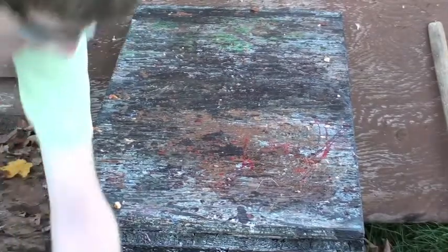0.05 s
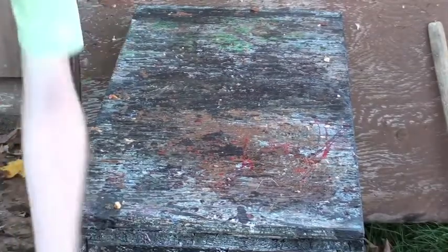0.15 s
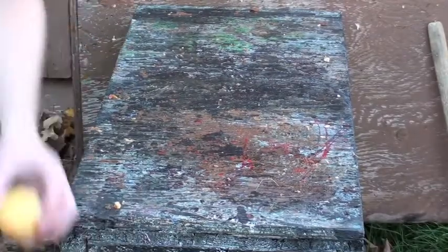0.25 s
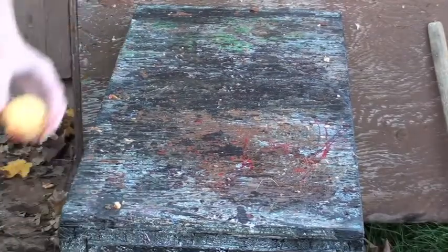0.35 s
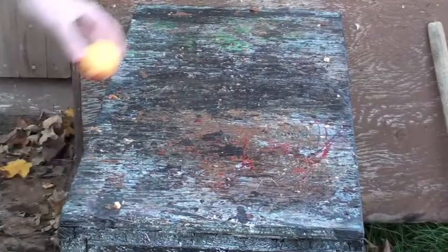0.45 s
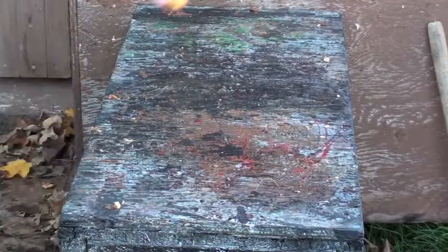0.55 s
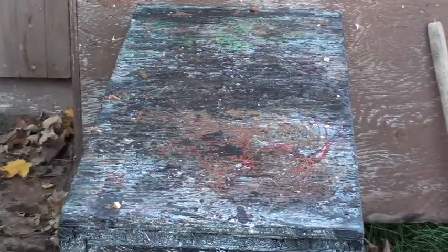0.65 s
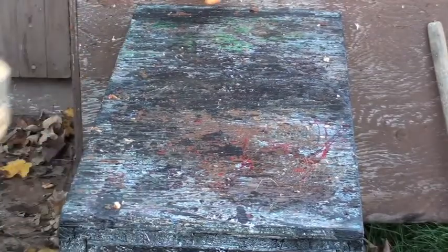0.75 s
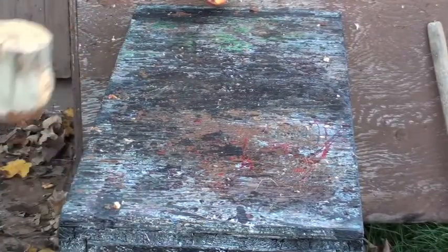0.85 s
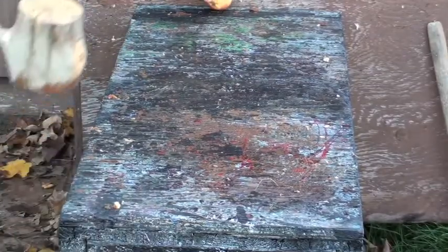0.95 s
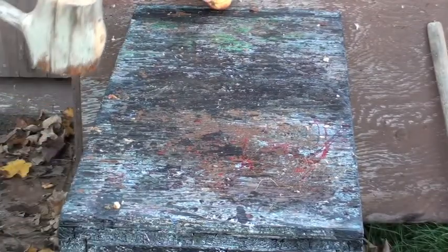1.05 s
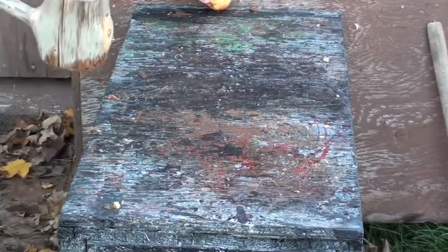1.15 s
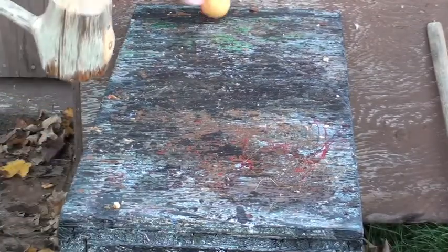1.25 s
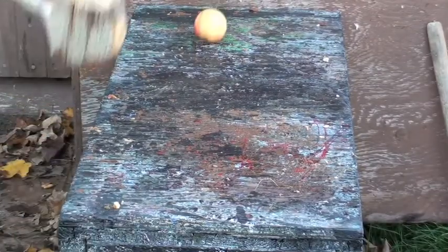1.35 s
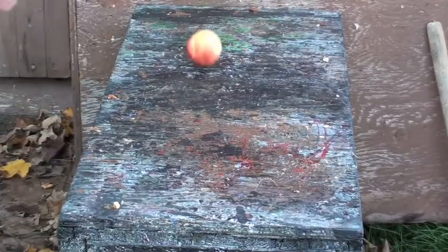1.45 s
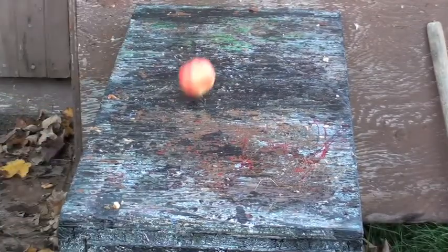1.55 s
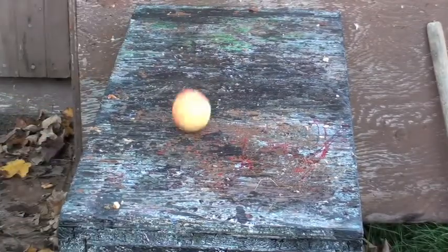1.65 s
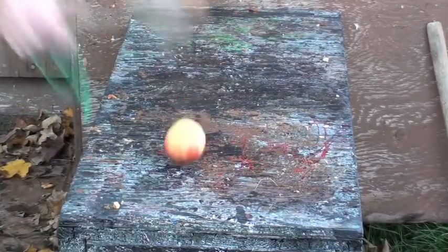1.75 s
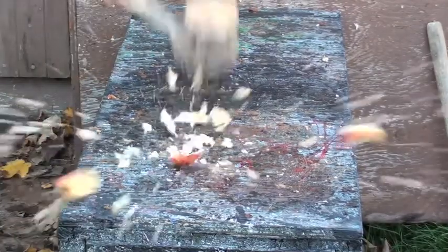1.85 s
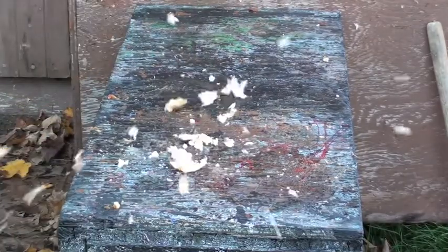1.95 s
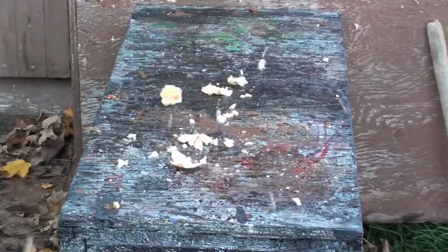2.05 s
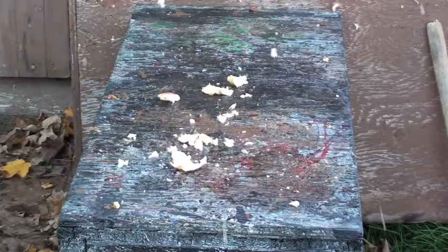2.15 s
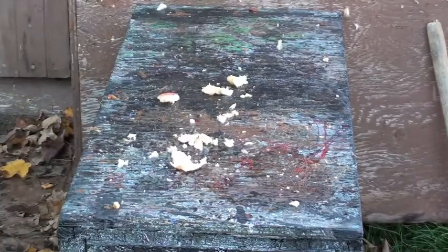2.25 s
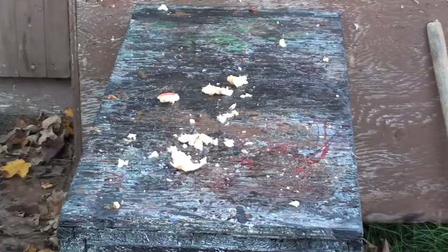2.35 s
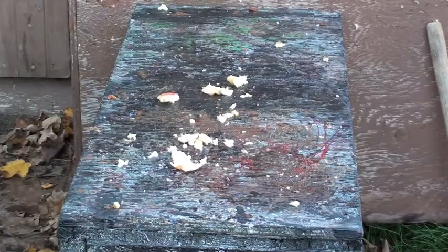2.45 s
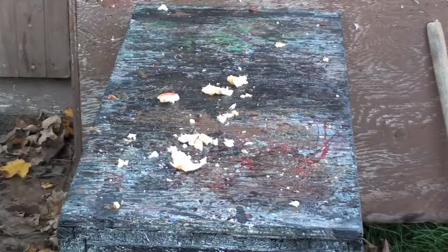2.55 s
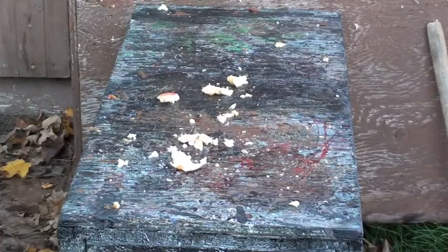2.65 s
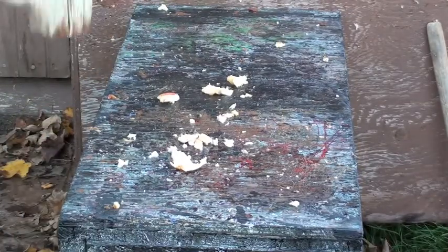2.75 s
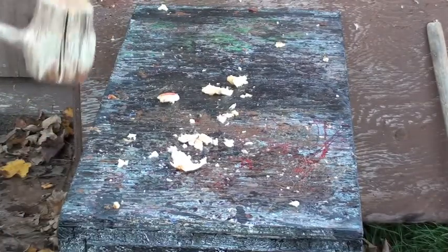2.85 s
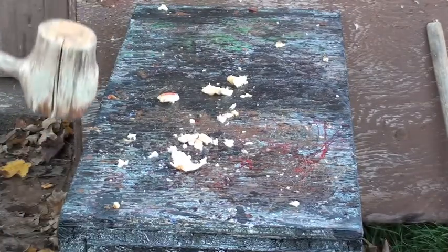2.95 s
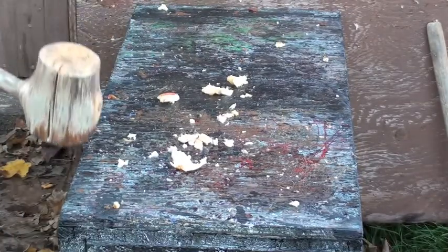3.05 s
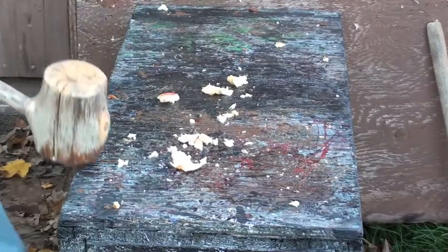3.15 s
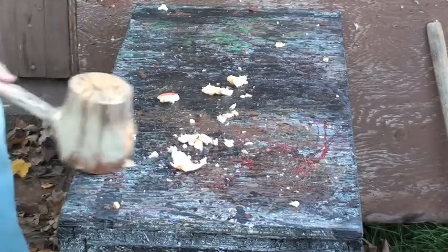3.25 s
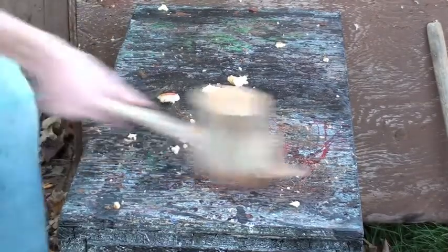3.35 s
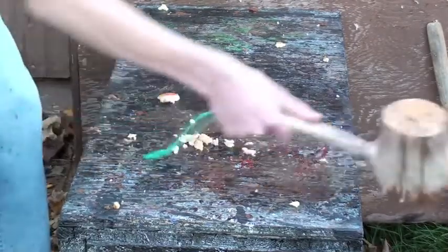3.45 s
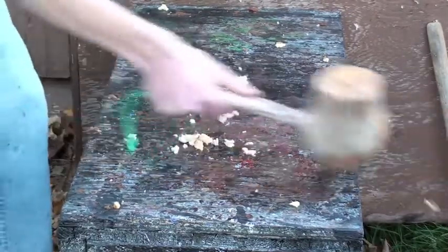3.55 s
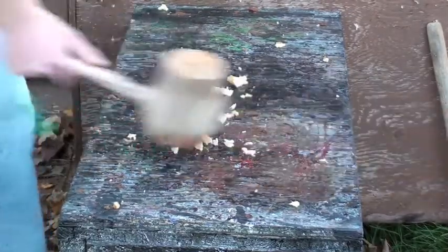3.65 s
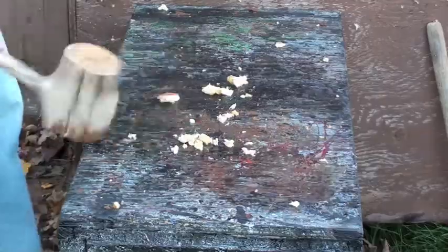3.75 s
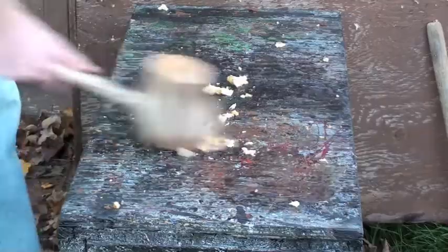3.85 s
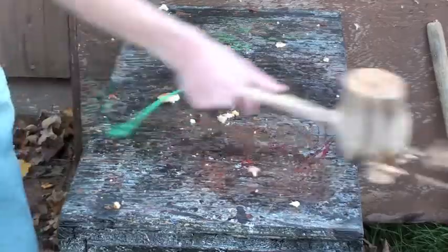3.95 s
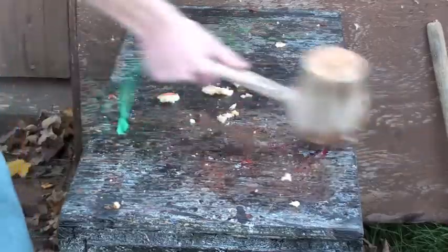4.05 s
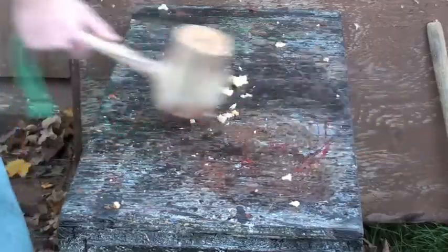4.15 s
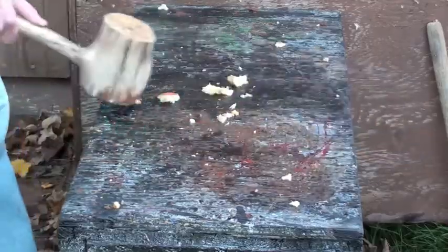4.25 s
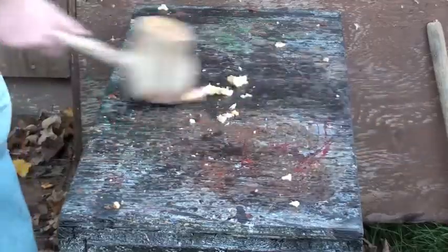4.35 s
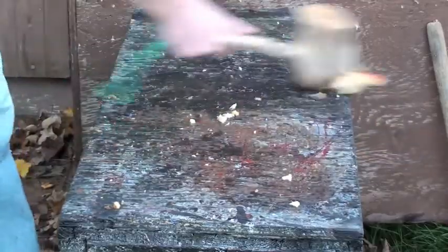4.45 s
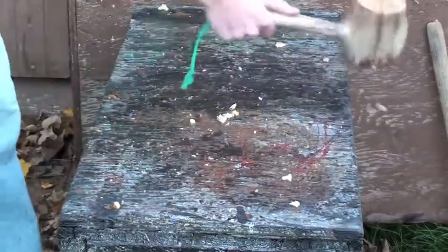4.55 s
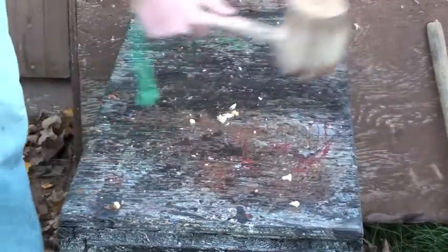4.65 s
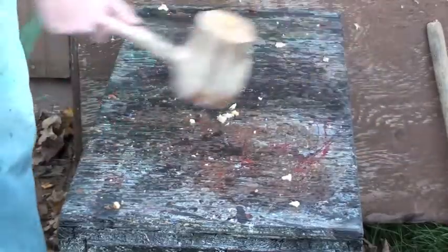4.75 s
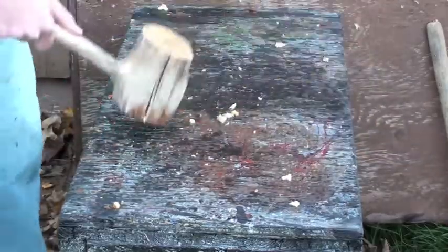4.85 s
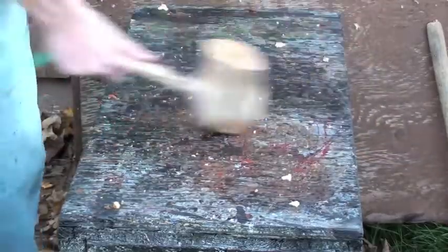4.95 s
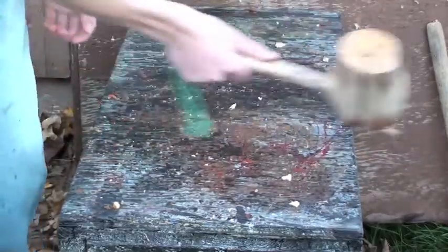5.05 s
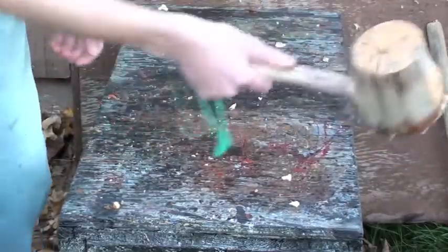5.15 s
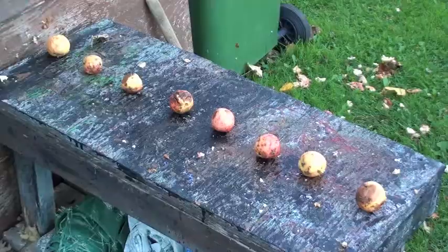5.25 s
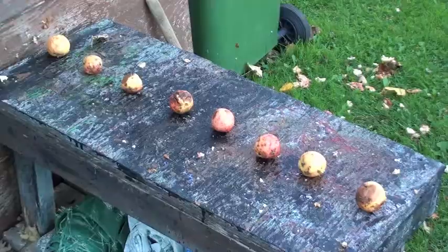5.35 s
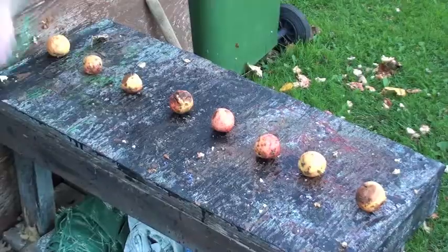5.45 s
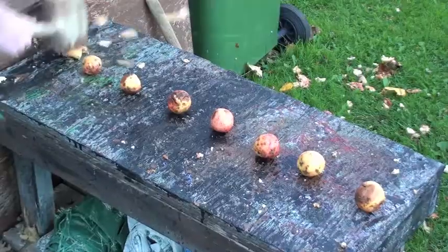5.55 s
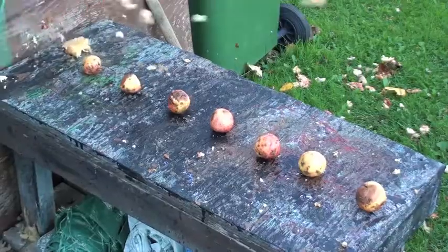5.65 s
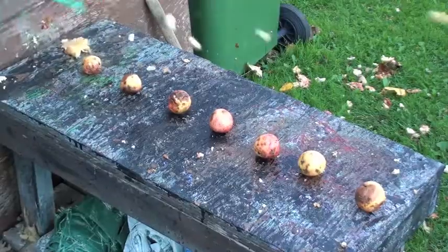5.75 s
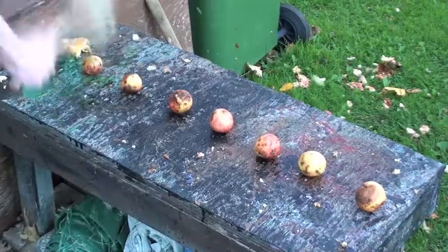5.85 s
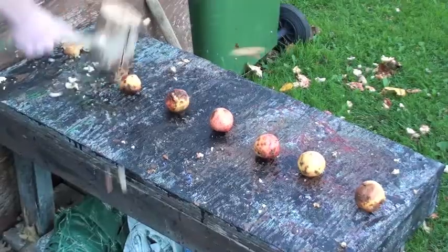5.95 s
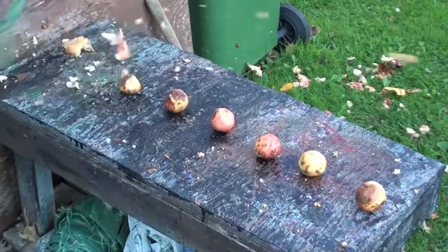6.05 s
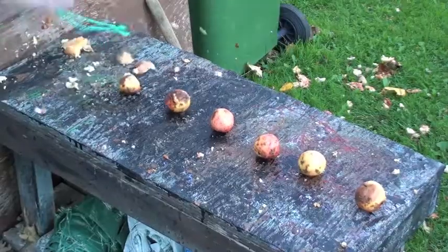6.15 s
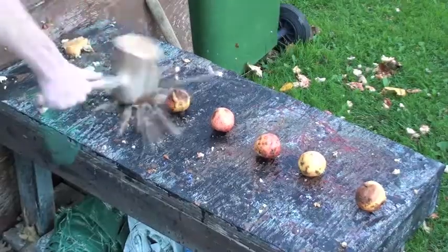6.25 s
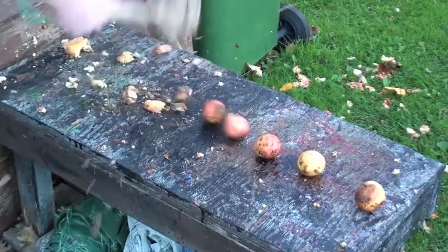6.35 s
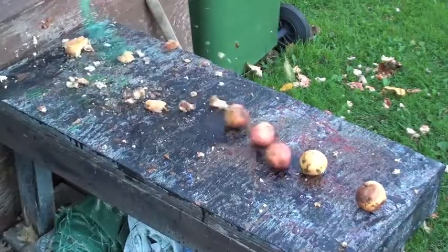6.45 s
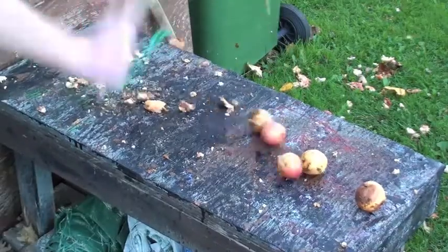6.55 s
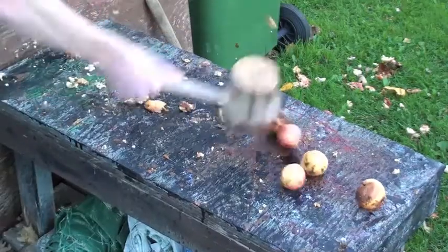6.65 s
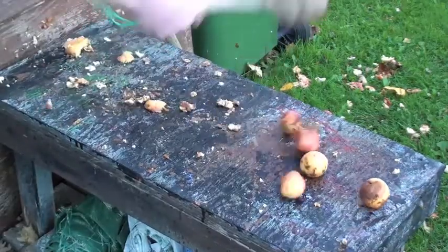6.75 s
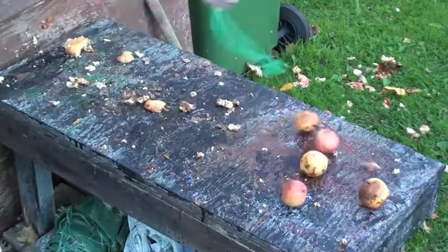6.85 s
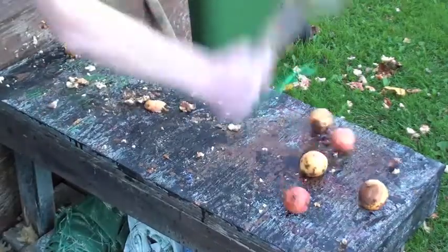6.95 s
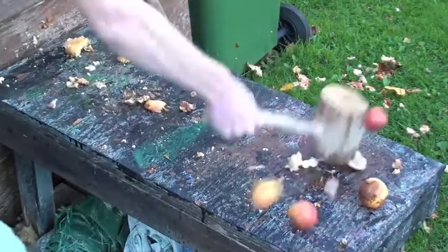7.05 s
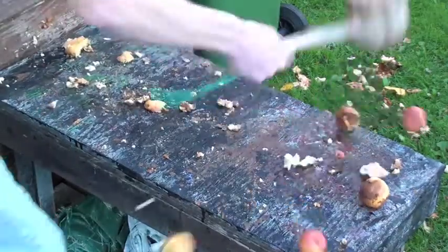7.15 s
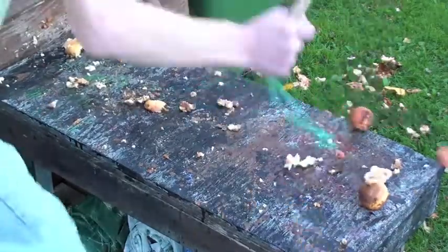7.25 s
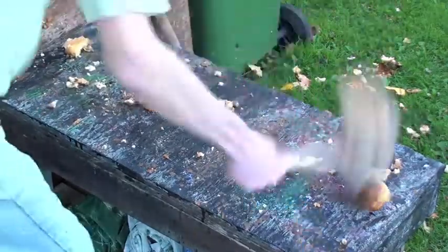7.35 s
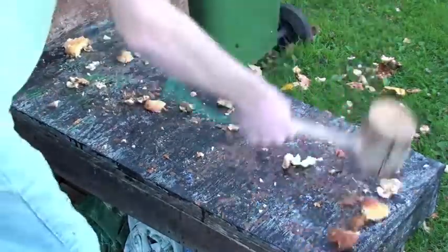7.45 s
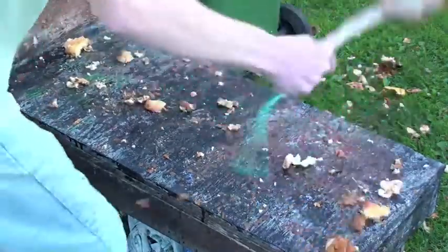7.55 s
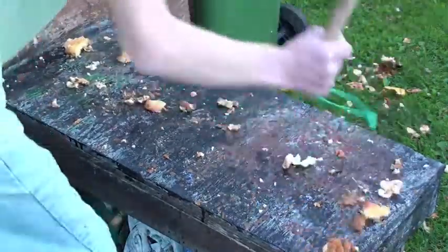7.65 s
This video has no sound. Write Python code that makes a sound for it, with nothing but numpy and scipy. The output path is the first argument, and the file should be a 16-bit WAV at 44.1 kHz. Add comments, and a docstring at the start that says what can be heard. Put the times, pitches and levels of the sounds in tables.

```python
"""In a back yard, a wooden mallet smashes apples on a plank bench, heard from close by.
An apple rolls down the bench and is burst; the mallet knocks and sweeps pulp away three times, then knocks once more.
After a short fade, six quick blows run along a row of apples; bits patter down and a thin poncho rustles.
Wood is modal resonance shaped by contact hardness; fruit is trains of tiny snaps, filtered and enveloped;
fabric is clumped crackle, and the yard is filtered noise with early reflections and a faint tail."""
import sys
import numpy as np
from scipy import signal
from scipy.fft import rfft, irfft, next_fast_len
from scipy.io import wavfile
from scipy.ndimage import uniform_filter1d, minimum_filter1d

SR = 44100
rng = np.random.default_rng(int(sys.argv[2]) if len(sys.argv) > 2 else 0)


def unload_wav(signal):
    """Save mono or channel-first audio to the path in sys.argv[1] as 16-bit WAV at rate SR, clipped to [-1, 1]."""
    wavfile.write(
        sys.argv[1],
        SR,
        np.round(np.clip(np.atleast_2d(signal).T, -1, 1) * 32767).astype(np.int16),
    )


N = 339129
SCENE_T = np.arange(N) / SR  # time over the whole scene [s]
T = np.arange(SR // 2) / SR  # time within one event [s]


def amp(db):
    """Logarithmic level: decibels to amplitude gain."""
    return 10 ** (np.asarray(db) / 20)


def unit(x):
    """Normalisation: scales to an rms of 1."""
    return x / np.sqrt(np.mean(x ** 2) + 1e-20)


def read(points, hz):
    """Interpolation: reads a table along a logarithmic frequency axis."""
    f, value = np.transpose(points)
    return np.interp(np.log(hz + 1), np.log(f + 1), value)


def colour(x, points, share=1):
    """Spectral weighting: filters by a table of (frequency [Hz], gain [dB])."""
    count = x.shape[-1]
    size = next_fast_len(count, real=True)
    gain = amp(share * read(points, np.fft.rfftfreq(size, 1 / SR)))
    return irfft(rfft(x, size) * gain, size)[..., :count]


def dull(x, hz, order=1):
    """Low-pass filtering: removes what lies above a cutoff."""
    sos = signal.butter(order, min(hz, SR / 2 - 1), fs=SR, output="sos")
    return signal.sosfilt(sos, x)


def resonate(x, hz, width_hz):
    """Resonance: one complex pole, whose frequency may follow a curve."""
    turn = np.exp(2j * np.pi * np.cumsum(hz * np.ones(len(x))) / SR)
    r = np.exp(-np.pi * width_hz / SR)
    return (turn * signal.lfilter([1 - r], [1, -r], x / turn)).real


def crackle(count, per_s, spread_db):
    """Shot noise: a random train of tiny snaps, whose level changes by spread_db per unit of rarity."""
    chance, side = rng.random((2, count))
    at = np.flatnonzero(chance < per_s / SR)
    rarity = -np.log(chance[at] * SR / per_s + 1e-9)  # high values are exponentially rarer
    train = np.zeros(count)
    train[at] = np.sign(side[at] - .5) * amp(spread_db * np.minimum(rarity, 3.5))
    return train


def crunch(count, per_s, spread_db, cycles, order=20):
    """Wet crunch as granular sound: tiny pops, each a few cycles long, at log-spaced pitches."""
    out = np.zeros(count)
    for hz in np.geomspace(200, 14000, order):
        turns = np.arange(4 * cycles * SR / hz) * hz / SR
        pop = np.sin(2 * np.pi * turns) * turns * np.exp(-2 * turns / cycles)
        # high pops are more frequent than low ones
        train = crackle(count, per_s / order * np.sqrt(hz / 2000), spread_db)
        out += signal.oaconvolve(train, pop / np.linalg.norm(pop))[:count] * hz ** 0.25
    return out


def swell(start, hold_s, rise_s, fall_s):
    """Envelope over the scene: an exponential rise up to the start, a hold, an exponential fall."""
    t = SCENE_T - start
    return np.exp(-np.clip(np.maximum(-t / rise_s, (t - hold_s) / fall_s), 0, 20))


def add(mix, s, sound):
    """Superposition: mixes a sound in at a time."""
    part = mix[max(round(s * SR), 0):][:len(sound)]
    part += sound[:len(part)]


# spectrum of the outdoor hush: (frequency [Hz], relative level [dB per Hz])
HUSH_SPECTRUM = [(20, -37), (45, -15), (70, -9.5), (100, -3), (135, 1.5), (190, -6), (280, -7.5),
                 (500, -3.5), (900, -6), (1600, -11), (2800, -14), (4100, -12), (5300, -17.5),
                 (7200, -18.5), (11500, -28), (16000, -30)]
# correlation of the two ears: (frequency [Hz], left-right likeness [0 to 1])
EAR_LIKENESS = [(60, 0.99), (180, 0.95), (550, 0.89), (1650, 0.82), (4970, 0.87), (15000, 1)]
# drift of the distant hum: (time [s], gain on its middle part [dB], gain on its low part [dB])
HUM_DRIFT = [(0, 5.5, -4), (.7, 3.5, -2), (1.2, -6, 1), (2.2, 3.5, -1.5), (3, -5, 0.5), (3.7, 0.5, -1),
             (4.3, 5, 0.5), (5, 8, -5), (6.2, -2, -1.5), (7.69, -9, 0)]


def air(level_db=-44.5):
    """Partial coherence: an outdoor hush partly alike in both ears, with a slowly drifting distant hum."""
    a, b = rfft(rng.standard_normal((2, N)))
    same = np.clip(read(EAR_LIKENESS, np.fft.rfftfreq(N, 1 / SR)), 0, 1)
    right = same * a + np.sqrt(1 - same ** 2) * b
    hush = unit(colour(irfft([a, right], N), HUSH_SPECTRUM))
    hum = colour(hush, [(150, -22), (400, -14), (1100, -19), (2500, -33)])
    rumble = colour(hush, [(150, 4), (300, -70)])
    s, hum_db, rumble_db = np.transpose(HUM_DRIFT)
    hum_change = hum * (amp(np.interp(SCENE_T, s, hum_db)) - 1)
    rumble_change = rumble * (amp(np.interp(SCENE_T, s, rumble_db)) - 1)
    return amp(level_db) * (hush + hum_change + rumble_change)


# decay of the yard's tail: (frequency [Hz], 60 dB decay time [s])
YARD_DECAY = [(100, 0.56), (300, 0.34), (1200, 0.54), (4000, 0.41), (10000, 1)]


def yard(x, near_db=-15, near_s=0.011, far_db=-20):
    """Reverberation: quick reflections from the shed wall and a faint yard tail, different in each ear."""
    near, far = rng.standard_normal((2, 2, len(T)))
    near = near * np.exp(-T / near_s) * (T > .002)
    hz, t, z = signal.stft(far, SR, nperseg=256)
    decay = amp(-60 * t / read(YARD_DECAY, hz)[:, None])
    far = signal.istft(z * decay, SR, nperseg=256)[1][:, :len(T)]
    far = far * (1 - np.exp(-T / 0.011))  # the tail builds up gradually
    echo = amp(near_db) * near / np.linalg.norm(near[0]) + amp(far_db) * far / np.linalg.norm(far[0])
    return signal.fftconvolve(x[None], echo, axes=1)[:, :N]


# spectrum of the thin fabric: (frequency [Hz], relative level [dB per Hz])
FABRIC_SPECTRUM = [(300, -8), (1200, -10), (2300, -9), (3200, -4.5), (4200, -3.5), (5300, -9), (6900, -2.5),
                   (8200, -7.5), (10000, -15.5), (12500, -27.5), (16000, -34)]
# the body moving between blows: (time of the peak [s], level [dB], rise [s], fall [s])
BODY_MOVES = [(.133, -42.5, .031, 0.046), (.50, -39.5, 0.074, .07), (.60, -40.5, .026, 0.041),
              (.725, -35.5, 0.004, .05), (.785, -44.5, .027, 0.077), (1.96, -35, .04, 0.049),
              (2.43, -43, .12, 0.084), (2.96, -43, 0.057, .092), (3.04, -43, .05, 0.045),
              (3.16, -41, 0.04, .042), (3.27, -41, 0.051, 0.058), (4.89, -39, 0.033, 0.038),
              (5.112, -38.5, 0.059, 0.068), (6.93, -36, .08, .07), (7.69, -33.5, 0.03, .03)]


def poncho(clump_db=2.16):
    """Friction noise: thin fabric crinkles in clumps, swelling with each body move, lift and swing."""
    moves = list(BODY_MOVES)
    for s, *_, swish_db, lead_s in BLOWS:
        swing_s = s - lead_s
        moves.append((swing_s - 0.059, swish_db - 10, 0.044, .04))  # the softer swish of lifting the mallet
        moves.append((swing_s, swish_db, 0.04, 0.02))
    power = sum((amp(db) * swell(s, 0, rise_s, fall_s)) ** 2 for s, db, rise_s, fall_s in moves)
    clumps = amp(clump_db * unit(dull(rng.standard_normal(N), hz=60, order=2)))
    crinkle = crackle(N, per_s=7000, spread_db=4.0) * clumps
    return unit(colour(crinkle, FABRIC_SPECTRUM)) * np.sqrt(power)


# bending modes of the planks: (frequency [Hz], 60 dB decay time [s],
# relative level struck at the far end [dB], in the middle [dB], at the near end [dB])
PLANK_MODES = [(70, 0.54, -12, -47, -37), (108, 0.17, -16.5, -43, -41), (145.8, 0.17, -9, -8.5, -6),
               (194.8, 0.13, 5.5, -15, -4), (220.2, 0.25, 5, -25, -24), (248.9, 0.15, -14.5, 4.5, -19),
               (259, 0.24, -5.5, -6.5, -16), (312.6, 0.23, 3.5, -32, 10.5), (363.3, 0.25, -14, -5, 1),
               (420.3, 0.085, -0.5, 5, -15.5), (475.4, 0.15, -10, 1.5, -21), (536, 0.088, 2, -4, -21),
               (621, 0.027, -1, -3.5, 8), (750, 0.15, -33.5, -12, -20), (860, 0.18, -10, -19, -3),
               (948, 0.057, 11, -1, 11), (1130, 0.11, -14, -47, -24), (1273, 0.06, -12, 6.5, -27),
               (1570, 0.13, -16, -5, -25), (1710, 0.27, -27, -12, -24), (2100, 0.23, -19, 1, -11),
               (2520, .08, -24, -34, -19)]


def bench(places):
    """Modal synthesis: the place struck decides which plank modes speak; one row for each place."""
    hz, t60 = np.transpose(PLANK_MODES)[:2, :, None]
    gain = amp([np.interp(places, [0, .5, 1], mode[2:]) for mode in PLANK_MODES])
    # bending waves arrive with a phase that grows as the root of frequency
    lag = np.sqrt(hz) * (1 + np.array(places) / 2)
    modes = amp(-60 * T / t60) * np.exp(2j * np.pi * hz * T)
    return ((gain * np.exp(-1j * lag)).T @ modes).imag


# spectrum of the dense upper modes: (frequency [Hz], relative level [dB])
CLACK_SPECTRUM = [(60, -29), (130, -11), (250, 8), (450, 11.5), (900, 0.5), (1300, -8.5), (2000, -4),
                  (3600, -6), (5500, -13), (8000, -5), (12000, -32), (16000, -40)]


def knocks(rows, contact_s=0.0024, clack_s=0.016, clack_reach=1.48):
    """Contact stiffness: soft contact wakes low modes, hard contact also a clack of countless higher ones.

    Rows: (time [s], ring peak [dB], place [0 far to 1 near], hardness cutoff [Hz], clack [dB])."""
    out = np.zeros(N)
    rings = bench([row[2] for row in rows])
    for (s, db, _, hard_hz, clack_db), ring in zip(rows, rings):
        ring = dull(ring * (1 - np.exp(-T / contact_s)), hard_hz, order=2)
        hiss = colour(rng.standard_normal(len(T)), CLACK_SPECTRUM)
        clack = unit(dull(hiss, clack_reach * hard_hz)) * np.exp(-T / clack_s)
        add(out, s, amp(db) * ring / abs(ring).max() + amp(clack_db) * clack)
    return out


# spectrum of cracking skin, also the touch of small bits: (frequency [Hz], relative level [dB])
CRACK_SPECTRUM = [(100, -33), (400, 8), (1500, 2), (2600, 0.5), (4000, 4.5), (5300, -4.5), (7000, 0.5),
                  (8700, -6.5), (11000, -18), (16000, -71)]


def splat(db, hz, width_share, t60, tick_s=0.0012, smear_db=-9):
    """Damped resonance: a tick and a short wet smear; narrow ones plop, and all are too small to give bass."""
    t = T[:len(T) // 2]
    shape = np.exp(-t / tick_s) + amp(smear_db - 60 * t / t60)
    touch = colour(rng.standard_normal(len(t)), CRACK_SPECTRUM) * shape
    touch = touch - dull(touch, hz / 2)  # removes the bass
    tick = resonate(touch, hz, width_share * hz)
    tick = dull(resonate(tick, hz, 2 * width_share * hz), hz=10300, order=6)
    return amp(db) * tick / abs(tick).max()


# bumps of the lumpy apple: (time [s], ring peak [dB], hardness cutoff [Hz], clack [dB])
APPLE_BUMPS = [(1.319, -35, 393, -37), (1.351, -36, 500, -42), (1.422, -35, 130, -60),
               (1.463, -38, 200, -55), (1.49, -26.5, 138, -55), (1.568, -26.5, 298, -30.5),
               (1.647, -25.5, 450, -34.5), (1.729, -25.5, 300, -45), (1.786, -33, 302, -41)]


def roll(start_s=1.28, end_s=1.84, end_place=0.72, rumble_db=-52, rise_s=.45, fall_s=.02):
    """Rolling contact: the lumpy apple gathers speed down the planks, bumping and rumbling softly."""
    bumps = []
    for s, db, hard_hz, clack_db in APPLE_BUMPS:
        place = end_place * ((s - start_s) / (end_s - start_s)) ** 2  # constant acceleration
        bumps.append((s, db, place, hard_hz, clack_db))
    rumble = signal.oaconvolve(crackle(N, per_s=200, spread_db=6), bench([.25])[0])[:N]
    rumble = unit(dull(rumble, hz=240, order=2))
    rolling = (SCENE_T > start_s) * swell(end_s, 0, rise_s, fall_s)
    return knocks(bumps) + amp(rumble_db) * rumble * rolling


# larger bits landing, splatters and small clacks:
# (time [s], peak level [dB], centre frequency [Hz], 60 dB decay time of the smear [s])
LANDING_BITS = [(0.233, -26, 6460, .012), (1.650, -28, 1760, 0.051), (1.9462, -22, 7300, .05),
                (1.9853, -13.5, 7200, 0.083), (2.0207, -16.5, 1870, 0.13), (2.1186, -30.5, 1480, .06),
                (2.21, -29.5, 1470, .06), (2.2631, -17, 7500, 0.17), (2.2712, -10.5, 5330, 0.045),
                (2.2777, -7, 6000, 0.074), (2.381, -19.5, 3370, 0.023), (2.5624, -28, 6600, 0.04),
                (3.0684, -5.5, 2440, 0.045), (3.0804, -6.5, 5500, 0.016), (3.123, -24, 2520, .17),
                (3.2208, -14.5, 2650, 0.036), (6.4095, -15, 4250, .045), (7.0564, -23, 4910, 0.016),
                (7.121, -11, 4200, 0.29), (7.6286, -16.5, 6840, 0.059), (7.6743, -14.5, 3530, 0.045)]


def bits(count=6, first_s=0.059, flight_s=.28, crumb_db=-29, fade_db_per_s=30,
         low_hz=1400, high_hz=8000, plop_hz=3800, widest=0.88):
    """Scattered impacts: larger bits land one by one; crumbs shower at random after blows, late ones softer."""
    out = np.zeros(N)

    def land(s, db, hz, t60):
        width = min(hz / plop_hz, 1) * widest  # low ones plop, high ones splash
        add(out, s, splat(db, hz, width_share=width, t60=t60))

    for s, db, hz, t60 in LANDING_BITS:
        land(s, db, hz, t60)
    for s, *_ in BLOWS:
        for late, pitch in rng.random((count, 2)):
            air_s = flight_s * late ** 2
            hz = low_hz * (high_hz / low_hz) ** pitch
            land(s + first_s + air_s, crumb_db - fade_db_per_s * air_s, hz, t60=0.026)
    return out


# spectrum of ploughed pulp: (frequency [Hz], relative level [dB])
GRIT_SPECTRUM = [(150, -7), (500, 2), (900, 11.5), (1300, 2), (1700, 3.5), (2500, 5), (3800, 7), (5200, -6),
                 (7000, -2), (8700, -7.5), (11500, -26.5), (16000, -62)]
# one sweep after each of the first three knocks: (time the head meets the pulp [s], ploughing [s], run-up [s],
# judder [dB], grit [dB], catch [dB], flick [dB], knock at lift-off [dB])
SWEEP_STROKES = [(3.404, 0.061, 0.049, -22, -22, -24, -10, -13),
                 (3.925, 0.057, 0.05, -27, -23, -10, -11, -34),
                 (4.453, .046, 0.12, -23, -23, -16, -7.5, -23)]


def sweeps(place=.5, catch_hz=1200, flick_hz=2900, clump_db=3.0, judder_fall_s=0.029,
           grit_rise_share=0.37, grit_fall_s=0.024, catch_clack_db=-5):
    """Stick-slip: the head judders over the grain, catches, ploughs clumps of pulp and flicks them off the edge."""
    shake, grind, flicks = np.zeros((3, N))
    catches = []
    for (down_s, *_), stroke in zip(MALLET_KNOCKS, SWEEP_STROKES):
        s, plough_s, run_up_s, judder_db, grit_db, catch_db, flick_db, lift_db = stroke
        lift_s = s + plough_s
        touching = SCENE_T > down_s
        shake += amp(judder_db) * touching * swell(s, plough_s, run_up_s, judder_fall_s)
        grind += amp(grit_db) * touching * swell(s, plough_s, grit_rise_share * run_up_s, grit_fall_s)
        catches.append((s, catch_db, place, catch_hz, catch_db + catch_clack_db))
        catches.append((lift_s, lift_db, place, catch_hz, lift_db + catch_clack_db))
        add(flicks, lift_s, splat(flick_db, flick_hz, width_share=0.57, t60=0.033))
    slips = crackle(N, per_s=600, spread_db=1.0)
    judder = unit(dull(signal.oaconvolve(slips, bench([place])[0])[:N], hz=690))
    clumps = amp(clump_db * unit(dull(rng.standard_normal(N), hz=69.5, order=2)))
    pulp = crunch(N, per_s=6200, spread_db=-0.5, cycles=1.86)
    grit = unit(colour(pulp, GRIT_SPECTRUM) * clumps)
    return judder * shake + grit * grind + knocks(catches) + flicks


# the bare mallet set down on the planks: (time [s], ring peak [dB], place [0 far to 1 near],
# hardness cutoff [Hz], clack [dB], bounce delay [s], bounce ring peak [dB])
MALLET_KNOCKS = [(3.278, -13.5, 0.53, 680, -15.5, .009, -25.5), (3.855, -8.5, 0.41, 560, -15, .011, -19),
                 (4.381, -12, 0.664, 480, -23.5, .011, -21), (4.964, -0.5, 0.55, 563, -11, .043, -13.5)]


def bare_knocks(bounce_clack_db=-5, bounce_hz=850, wet_db=-19, wet_hz=3600):
    """Impact and rebound: the bare mallet lands on the wet planks and bounces once."""
    rows, wet = [], np.zeros(N)
    for s, db, place, hard_hz, clack_db, bounce_s, bounce_db in MALLET_KNOCKS:
        rows.append((s, db, place, hard_hz, clack_db))
        rows.append((s + bounce_s, bounce_db, place, bounce_hz, bounce_db + bounce_clack_db))
        add(wet, s, splat(db + wet_db, wet_hz, width_share=0.49, t60=0.17))
    return knocks(rows) + wet


# spectrum of crushed flesh: (frequency [Hz], relative level [dB])
PULP_SPECTRUM = [(80, -31), (200, 11.5), (500, 6), (1100, 0.5), (1500, -1), (2200, -4.5), (4200, -5.5),
                 (5400, -11.5), (7000, -9), (9000, -15.5), (12000, -23), (16000, -53)]
# the apple under each blow: (skin crack [dB], crack decay [s], squelch [dB], squelch start [Hz], spray [dB],
# spray delay [s], spray cutoff [Hz], pop delay [s], pop peak [dB], pop frequency [Hz])
BURST_APPLES = [(-15, 0.014, -28, 2700, -22, 0.0051, 13000, .0414, -16, 5400),
                (-17, 0.0041, -6, 4500, -24.5, 0.039, 6900, 0.02, -6, 880),
                (-15, 0.0093, -14.5, 5800, -25.5, 0.029, 9000, 0.014, -10, 850),
                (-14, 0.0063, -12.5, 1800, -21.5, 0.009, 6500, 0.071, -11, 690),
                (-27, .0076, 2, 1130, -15, 0.029, 5600, 0.033, -3, 1150),
                (-10.5, 0.0021, -4.5, 1950, -17, 0.044, 5000, 0.033, 1, 1860),
                (-8, 0.0025, -6, 1600, -16, 0.041, 4600, .06, -20, 1200)]


def apples(give_s=.0055, squelch_s=0.024, glide_s=0.0071, end_hz=520, width_hz=800,
           spray_s=0.026, drizzle_db=-15, drizzle_s=0.21):
    """Fracture and collapse: skin cracks, flesh gives a falling squelch and hollow pop, then pulp sprays."""
    out, count = np.zeros(N), len(T)
    for (s, *_), apple in zip(BLOWS, BURST_APPLES):
        crack_db, crack_s, squelch_db, start_hz, spray_db, delay, bright_hz, pop_s, pop_db, pop_hz = apple
        crack = unit(colour(crackle(count, per_s=9900, spread_db=2.5), CRACK_SPECTRUM))
        add(out, s, amp(crack_db) * crack * np.exp(-(T / crack_s) ** 2 / 2))
        # the pitch of the squelch sinks as the flesh brakes the mallet
        glide = end_hz + (start_hz - end_hz) * np.exp(-T / glide_s)
        cells = colour(crackle(count, per_s=9000, spread_db=-5.0), PULP_SPECTRUM)
        squelch = unit(resonate(cells, glide, width_hz))
        add(out, s + give_s, amp(squelch_db) * squelch * np.exp(-T / squelch_s))
        add(out, s + pop_s, splat(pop_db, pop_hz, width_share=0.43, t60=0.052))
        droplets = colour(crunch(count, per_s=9000, spread_db=2.5, cycles=1.9), PULP_SPECTRUM)
        spray = unit(dull(droplets, bright_hz, order=3))
        burst = np.exp(-((T - delay) / spray_s) ** 2 / 2)
        drizzle = amp(drizzle_db) * np.exp(-T / drizzle_s)
        add(out, s, amp(spray_db) * spray * (burst + drizzle))
    return out


# smashing blows: (time [s], place [0 far to 1 near], hardness cutoff [Hz], push [dB], crush time [s], thud [dB],
# rebound delay [s], rebound [dB], swing swish [dB], lead of the swish before the blow [s])
BLOWS = [(1.8459, 0.44, 1200, -7, 0.01, -22, 0.046, -26, -62, .08),
         (5.555, 0.054, 756, -6, 0.021, -1, 0.046, -15, -34, 0.021),
         (5.941, 0.054, 610, -3, .024, -1, .04, -8, -37.5, 0.071),
         (6.316, 0.069, 890, -2, 0.033, -4.5, 0.058, -4.5, -39, 0.085),
         (6.682, 0.79, 1500, 3.5, .034, -4, 0.081, -19, -38, 0.11),
         (7.075, 0.95, 700, -11.5, .012, 0, 0.047, -11, -31.5, 0.072),
         (7.44, .92, 710, -19, .014, 0, 0.057, -15.5, -28.5, .11)]


def blows(push_s=0.0019, rebound_hz=1680, push_clack_db=-13, thud_clack_db=-12.5, rebound_clack_db=-10):
    """Momentum transfer: each blow rings the bench by a push through the apple, a crushing thud and a rebound."""
    rows = []
    for s, place, hard_hz, push_db, crush_s, thud_db, rebound_s, rebound_db, _, _ in BLOWS:
        # the apple passes the push on a little late
        rows.append((s + push_s, push_db, place, hard_hz, push_db + push_clack_db))
        rows.append((s + crush_s, thud_db, place, hard_hz, thud_db + thud_clack_db))
        # the rebound lands on bare wood, so it is hard
        rows.append((s + rebound_s, rebound_db, place, rebound_hz, rebound_db + rebound_clack_db))
    return knocks(rows)


# small things radiate little deep bass: (frequency [Hz], gain [dB])
RADIATION_GAIN = [(20, -27), (45, -16), (75, -15), (110, -1.5), (16000, 1.5)]
# level difference between the ears: (frequency [Hz], left minus right [dB])
EAR_BALANCE = [(60, -7), (150, -3), (300, -3), (650, -1.5), (1400, -0.4), (4000, 0.1), (12000, 0.4)]


def scene():
    """Superposition: the sources share the yard, the bench booms a little to the right, and air surrounds all."""
    sources = poncho() + roll() + sweeps() + bits() + bare_knocks() + apples() + blows()
    dry = colour(sources, RADIATION_GAIN)
    heard = dry + yard(dry)
    left = colour(heard[0], EAR_BALANCE, share=1 / 2)
    right = colour(heard[1], EAR_BALANCE, share=-1 / 2)
    return np.array([left, right]) + air()


def record(dry, ceiling_db=-5, ratio=5, recover_db_per_s=500, fade_at_s=5.285, fade_s=.11, edge_hz=16250):
    """Dynamic compression: fast gain reduction tames peaks; a fade out and in, then a band limit, follow."""
    peak = -minimum_filter1d(-abs(dry).max(0), size=24)
    over_db = np.maximum(20 * np.log10(peak + 1e-9) - ceiling_db, 0) * (1 - 1 / ratio)
    fall = SCENE_T * recover_db_per_s
    held_db = np.maximum.accumulate(over_db + fall) - fall  # instant attack, steady recovery
    duck_db = uniform_filter1d(held_db, size=16)
    fade = np.minimum(abs(SCENE_T - fade_at_s) / fade_s, 1)
    band = signal.firwin(511, edge_hz, window=("kaiser", 9), fs=SR)
    return signal.oaconvolve(dry * amp(-duck_db) * fade, band[None], "same")


dry = scene()
out = record(dry)
unload_wav(out)
```